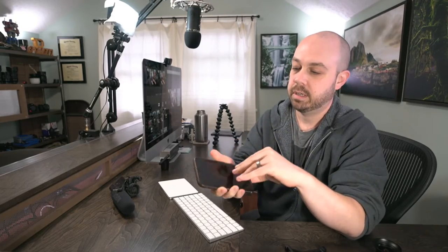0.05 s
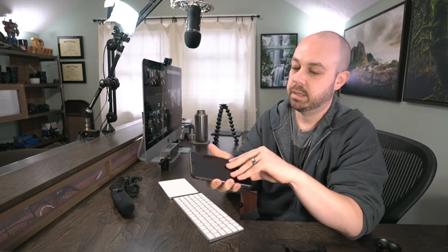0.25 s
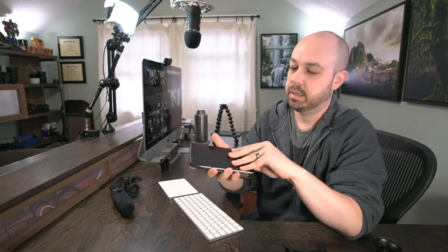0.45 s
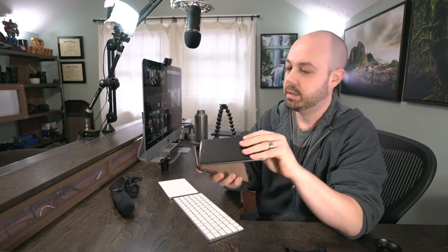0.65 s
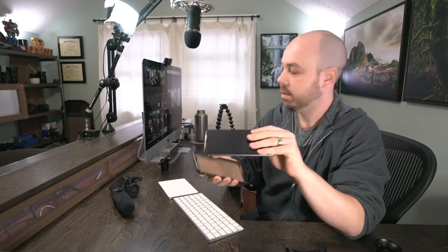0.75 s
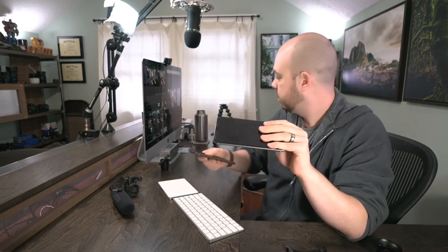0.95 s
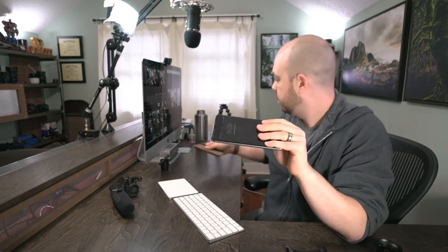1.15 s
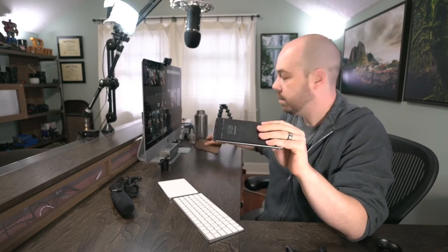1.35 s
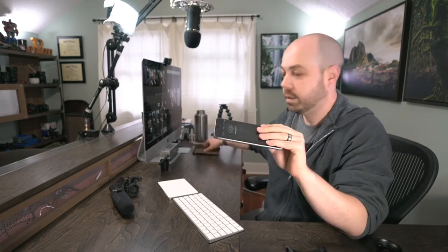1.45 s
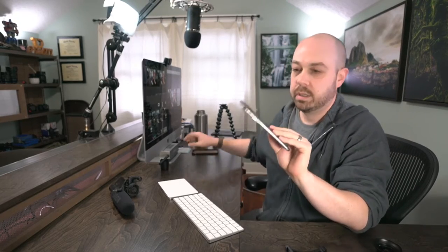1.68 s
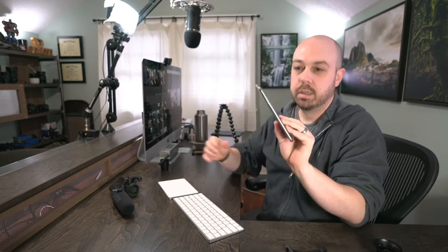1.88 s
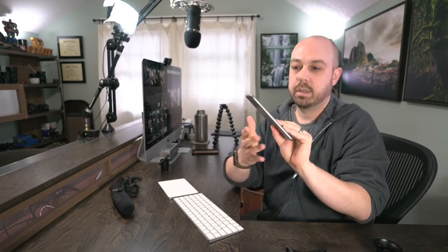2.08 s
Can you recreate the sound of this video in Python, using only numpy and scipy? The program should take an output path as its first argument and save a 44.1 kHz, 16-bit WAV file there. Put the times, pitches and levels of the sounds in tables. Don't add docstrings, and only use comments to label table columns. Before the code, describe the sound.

A leather phone case clatters on a wooden desk: a flat, hard slap near 1.4 s, then a brighter edge rattle near 1.48 s, with short room reverberation. Before it, faint leather creaks and tiny snaps from 0.07 to 0.6 s, then soft sleeve swishes until 1.3 s. Two small finger taps on the phone at 1.86 and 1.93 s. Quiet low room tone, overhead microphone.

```python
import sys
import numpy as np
from scipy import signal
from scipy.fft import rfft, irfft, next_fast_len
from scipy.io import wavfile
from scipy.ndimage import map_coordinates

SR = 44100
rng = np.random.default_rng(int(sys.argv[2]) if len(sys.argv) > 2 else 0)


def dump(signal):
    limited = np.clip(np.atleast_2d(signal).T, -1, 1)
    pcm = np.round(limited * 32767).astype(np.int16)
    wavfile.write(sys.argv[1], SR, pcm)


def ratio_of_db(decibels):
    return 10 ** (np.asarray(decibels, float) / 20)


N = 93447


def leather():
    # start_s, creak_db, seam_db, snap_db, body_db
    slips = [(0.0727, -40, -74, -75, -44.5), (0.0877, -46, -70, -80, -67), (0.0961, -51, -73, -80, -42),
             (0.1102, -41.5, -66, -80, -44), (0.1461, -41.5, -63, -80, -40), (.1495, -46, -60, -48.5, -68),
             (0.1513, -40, -47, -70, -35.5), (0.205, -40, -52, -44, -68), (.2062, -50, -49, -70, -38.5),
             (0.2235, -43, -54, -67, -43), (0.2334, -45, -67, -80, -42.5), (0.241, -55, -65, -82, -44),
             (0.456, -37.5, -33.5, -47, -63), (0.4936, -39, -59, -72, -78), (0.499, -37.5, -42, -68, -67),
             (0.5218, -46.5, -52, -56, -70), (0.6073, -48.5, -70, -49, -41.5), (0.836, -47, -70, -80, -79)]
    # start_s, length_s, level_db
    drags = [
        (.04, 0.14, -73.5),
        (.18, .12, -72),
        (.3, 0.1, -60),
        (.44, 0.081, -60.5),
    ]
    # pitch_hz, width_hz, level_db
    hide = [(1535, 327, 1), (1960, 310, 1.5), (2576, 320, -6)]
    # pitch_hz, width_hz, level_db
    seam = [(2480, 130, 1), (3430, 800, 0), (5170, 1460, -5.5)]
    # pitch_hz, width_hz, level_db
    snap = [(8900, 1500, 9), (12800, 5400, -20)]
    # pitch_hz, width_hz, level_db
    palm = [(352, 206, -8.5), (706, 190, -9.5)]
    slip_t60_s, snap_t60_s, slips_per_s = 0.012, 0.004, 5000

    grit = (rng.random(N) < slips_per_s / SR) * rng.standard_normal(N)
    grit = grit * ratio_of_db(2 * wobble(59.3))
    creak = unit(ring(ring(grit, hide), hide))
    drag = strokes(drags) * (creak + ratio_of_db(-6) * unit(ring(grit, palm)))

    s, creak_db, seam_db, snap_db, body_db = np.transpose(slips)
    out = drag + ring(ring(clicks(s, creak_db - 12, slip_t60_s, knock_db=9.5), hide), hide, 1.66)
    out += ring(clicks(s, body_db, slip_t60_s, knock_db=11.5), palm)
    out += ring(clicks(s, seam_db, snap_t60_s), seam)
    return out + ring(clicks(s, snap_db, snap_t60_s), snap)


def case():
    contact_s = [1.3801, 1.3949, 1.3962, 1.4015, 1.4793, 1.4812, 1.4833, 1.4885, 1.4965]
    # level_db, scuffle_t60_s, edge (0 flat side - 1 edge)
    contacts = [
        (-28, 0.043, 0),
        (-15.5, .012, 0.019),
        (-12, .016, 0.0034),
        (-21.5, 0.022, 0.21),
        (-44, 0.0067, 0.89),
        (-13, 0.022, 0.95),
        (-20, 0.013, 1),
        (-28.5, 0.045, 0.35),
        (-30.5, 0.0067, 0.99),
    ]
    # pitch_hz, width_hz, level_db
    graze_modes = [(1110, 140, -2), (2040, 117, 3), (3160, 130, -7), (4500, 160, -17)]
    # pitch_hz, width_hz, level_db
    flat_modes = [(398, 330, -12), (753, 62, -6.5), (1050, 36, 0.5), (1560, 153, -4.5), (2070, 163, -2),
                  (3070, 81, -48), (6420, 120, -15), (6540, 70, -44), (9460, 97, -57)]
    # pitch_hz, width_hz, level_db
    edge_modes = [(410, 29, -10), (1337, 63, 4.5), (2100, 87, -8), (2940, 107, -3), (3320, 95, -11.5),
                  (3750, 91, -3), (7200, 86, -16.5), (8080, 61, -14), (11480, 77, -20.5)]
    # pitch_hz, width_hz, level_db
    desk_modes = [(44, 19, 0), (132, 37, 5), (298, 170, -8.5)]
    # pitch_hz, width_hz, level_db
    shell_modes = [(284, 25, -5), (990, 26, -22), (1280, 41, 8), (1900, 30, -11), (3280, 40, -14),
                   (3830, 45, -2)]
    # pitch_hz, level_db_per_hz
    flat_air = [(35, -60), (60, -9), (286, 2.5), (817, -12), (1030, -4), (2330, -8), (3310, -30),
                (6990, -27.5), (15800, -56)]
    # pitch_hz, level_db_per_hz
    edge_air = [(60, -12.5), (156, 2.5), (700, -4), (1300, -2.5), (3700, -5.5), (5500, -16.5),
                (11000, -17.5), (15700, -27)]
    widen, soft_hz = 2.74, 8400

    s = np.array(contact_s)
    db, t60_s, edge = np.transpose(contacts)
    flat_db, edge_db = db + 10 * np.log10(np.clip([1 - edge, edge], 0.001, 1))
    graze = bursts(s[:1], db[:1], t60_s[:1])
    flat = bursts(s[1:], flat_db[1:], t60_s[1:])
    rim = bursts(s[1:], edge_db[1:], t60_s[1:])
    flat = filtered(flat, lambda hz: 1 / (1 + 1j * hz / soft_hz) ** 2)

    out = ring(graze, graze_modes, widen) + ring(flat, flat_modes, widen) + ring(rim, edge_modes, widen)
    out += ratio_of_db(-22) * ring(flat + rim, desk_modes)
    out += ratio_of_db(-53) * flat + ratio_of_db(-13) * rim
    out += ratio_of_db(-42) * ring(flat + rim, shell_modes)

    for at_s, flat_room_db, edge_room_db in zip(s, flat_db + 25.5, edge_db + 23.5):
        def air(hz):
            flat_gain = ratio_of_db(flat_room_db + along(flat_air, hz))
            return flat_gain + ratio_of_db(edge_room_db + along(edge_air, hz))

        blow = np.arange(N) == round(at_s * SR)
        out += room(filtered(blow, air))
    return out


def taps():
    # start_s, thud_db, click_db, thud_hz
    hits = [
        (0.6049, -42.5, -56, 104),
        (1.114, -44.5, -75, 104),
        (1.15, -44.5, -79, 112),
        (1.8633, -37.5, -36.5, 74),
        (1.928, -32.5, -29, 78.4),
        (2.092, -47, -81, 77),
    ]
    # pitch_hz, width_hz, level_db
    nail = [(710, 1300, -6), (2860, 650, -0.5), (4450, 910, 0.5), (12100, 3500, -17)]
    thud_t60_s, click_t60_s, sag, sag_s, pad_hz = 0.055, 0.004, 1.2, 0.004, 6000

    thuds, t = np.zeros(N + SR), np.arange(SR // 8) / SR
    for at_s, thud_db, _, hz in hits:
        turns = hz * (t + sag * sag_s * (1 - np.exp(-t / sag_s)))
        thud = ratio_of_db(thud_db + 0.5 - 60 * t / thud_t60_s) * np.sin(2 * np.pi * turns)
        thuds[round((at_s + 0.001) * SR):][:len(t)] += thud

    s, _, click_db, _ = np.transpose(hits)
    nails = clicks(s, click_db, click_t60_s, knock_db=11)
    nails = filtered(nails, lambda hz: 1 / (1 + 1j * hz / pad_hz) ** 2)
    return thuds[:N] + ring(nails, nail)


def sleeve():
    # start_s, length_s, level_db
    swishes = [
        (.28, 0.16, -67.5),
        (.44, .16, -64),
        (.57, 0.072, -66),
        (.72, 0.29, -63.5),
        (.9, 0.14, -64),
        (.98, 0.22, -62.5),
        (1.12, 0.22, -69.5),
        (1.65, 0.53, -70),
    ]
    # pitch_hz, level_db_per_hz
    cloth = [(1500, -33), (3000, -0.5), (5500, -5), (9000, -1.5), (12000, -1.5), (15500, -1.5)]
    return strokes(swishes) * ratio_of_db(1.5 * wobble(41.3)) * hiss(cloth)


def room_tone():
    # pitch_hz, level_db_per_hz
    steady = [(25, -21.5), (70, -4.5), (344, -1.5), (714, -7.5), (2000, -11.5), (3200, -21), (6500, -29),
              (15500, -29)]
    # pitch_hz, level_db_per_hz
    rumble = [(25, 1), (70, 7.5), (140, 7.5), (350, 0.5), (900, -40.5)]
    # time_s, level_db
    stir = [
        (0.0, -63),
        (0.32, -66),
        (0.66, -62),
        (0.82, -57.5),
        (1.37, -62.5),
        (1.47, -61.5),
        (1.82, -62.5),
        (2.11, -62),
    ]
    s, db = np.transpose(stir)
    stir_db = np.interp(np.arange(N) / SR, s, db - db.mean())
    swing_db = 6 * np.tanh(wobble(16))
    return ratio_of_db(-61) * hiss(steady) + ratio_of_db(-63 + stir_db + swing_db) * hiss(rumble)


def room(x):
    # pitch_hz, t60_s
    decay = [(100, 0.26), (260, 0.18), (700, .43), (1840, 0.37), (4850, 0.42), (12800, 0.35)]
    delay_s = 0.006
    hz, t, z = signal.stft(rng.standard_normal(SR // 2), SR, nperseg=256)
    fade = ratio_of_db(-60 * t / along(decay, hz)[:, None])
    tail = signal.istft(z * fade, SR, nperseg=256)[1]
    late = np.pad(x, (round(delay_s * SR), 0))
    return signal.fftconvolve(late, tail / np.linalg.norm(tail))[:N]


def strokes(rows):
    t = np.arange(N) / SR
    power = 0
    for start_s, length_s, db in rows:
        swell = np.sin(np.pi * np.clip((t - start_s) / length_s, 0, 1))
        power = power + (ratio_of_db(db) * swell) ** 2
    return np.sqrt(power)


def clicks(times_s, dbs, t60_s, knock_db=9):
    out = bursts(times_s, dbs - 7, t60_s, rise_s=0.00025)
    np.add.at(out, np.round(times_s * SR).astype(int), ratio_of_db(dbs + knock_db))
    return out


def bursts(times_s, dbs, t60s, rise_s=0.00022):
    out, t = np.zeros(N + SR), np.arange(SR // 20) / SR
    for at_s, db, t60_s in np.broadcast(times_s, dbs, t60s):
        shape = ratio_of_db(-60 * t / t60_s) * (1 - np.exp(-t / rise_s))
        puff = shape * rng.standard_normal(len(t))
        puff *= np.linalg.norm(shape) / np.linalg.norm(puff)
        out[round(at_s * SR):][:len(t)] += ratio_of_db(db) * puff
    return out[:N]


def ring(x, peaks, widen=1):
    def body(f):
        total = 0
        for k, (pitch_hz, width_hz, db) in enumerate(peaks):
            loss = 1j * f * width_hz * widen
            total = total + (-1) ** k * ratio_of_db(db) * loss / (pitch_hz * pitch_hz - f * f + loss)
        return total

    power = np.mean(abs(body(np.linspace(1, SR / 2, 4000))) ** 2)
    return filtered(x, body) / np.sqrt(power)


def hiss(spectrum):
    return unit(filtered(rng.standard_normal(N), lambda hz: ratio_of_db(along(spectrum, hz)) * (hz > 18)))


def filtered(x, response):
    m = next_fast_len(N + SR // 2)
    return irfft(rfft(x, m) * response(np.fft.rfftfreq(m, 1 / SR)), m)[:N]


def wobble(rate_hz):
    knots = rng.standard_normal(int(N * rate_hz / SR) + 4)
    return map_coordinates(knots, [np.arange(N) * rate_hz / SR])


def along(points, hz):
    f, v = np.transpose(points)
    return np.interp(np.log(hz + 1), np.log(f + 1), v)


def unit(x):
    return x / np.sqrt(np.mean(x ** 2) + 1e-20)


def scene():
    rub, tap = leather(), taps()
    hands_room = room(ratio_of_db(-8.5) * rub + ratio_of_db(-18) * tap)
    return (case() + rub + tap + hands_room + sleeve() + room_tone())[None]


def roll_off(x):
    return signal.sosfilt(signal.butter(12, 16610, fs=SR, output="sos"), x)


def record(dry):
    # pitch_hz, level_db
    mic = [(11000, 0.5), (15700, -4.5)]

    def response(hz):
        gain = np.where(hz < 15700, ratio_of_db(along(mic, hz)), ratio_of_db(-30))
        return gain * (hz < 16600)

    mix = filtered(dry[0], response)[None]
    return roll_off(mix)


dry = scene()
out = record(dry)
dump(out)
```